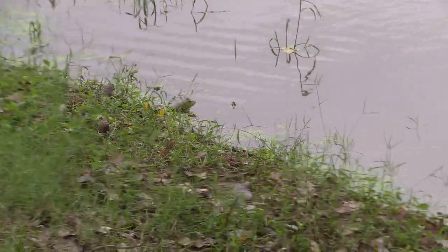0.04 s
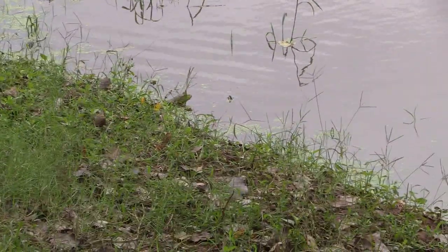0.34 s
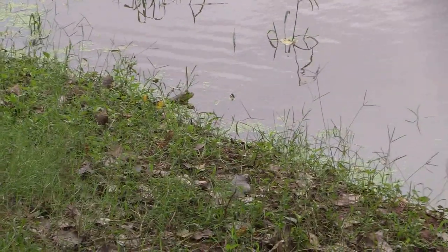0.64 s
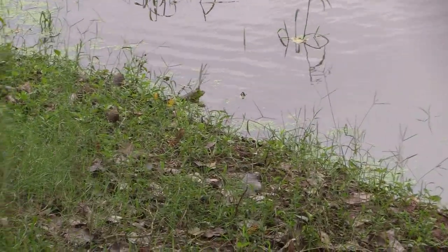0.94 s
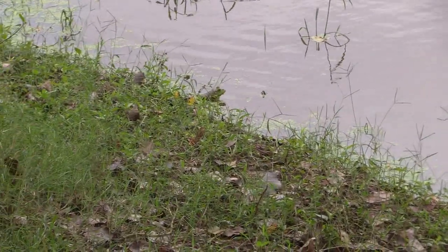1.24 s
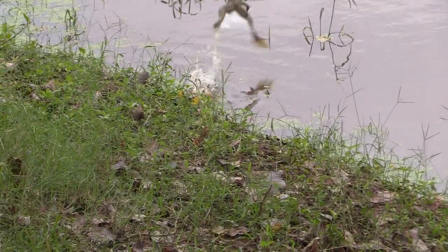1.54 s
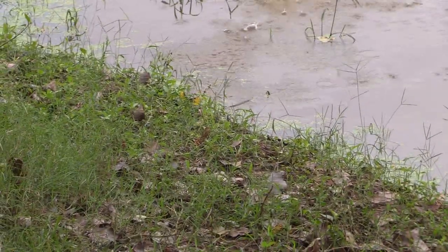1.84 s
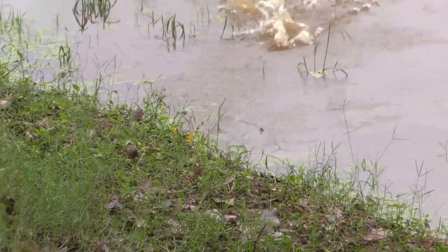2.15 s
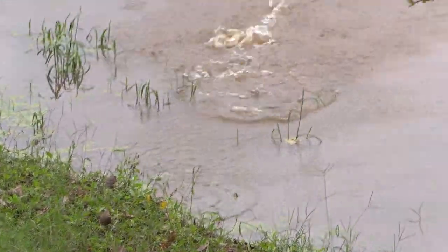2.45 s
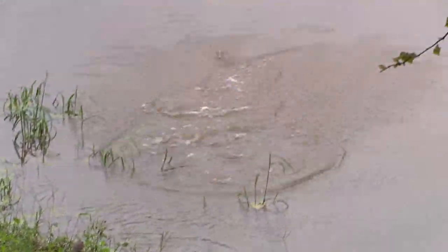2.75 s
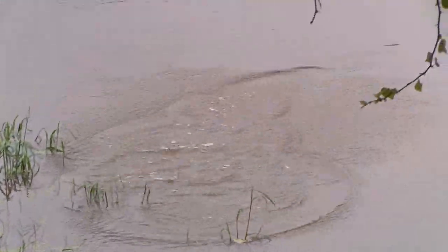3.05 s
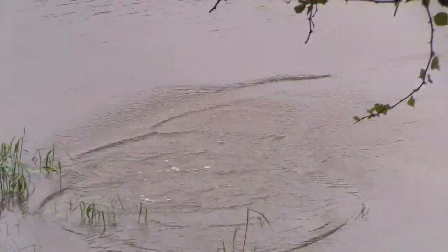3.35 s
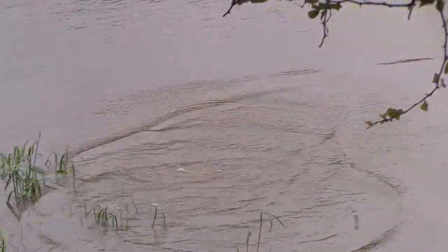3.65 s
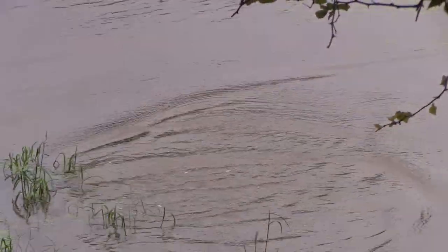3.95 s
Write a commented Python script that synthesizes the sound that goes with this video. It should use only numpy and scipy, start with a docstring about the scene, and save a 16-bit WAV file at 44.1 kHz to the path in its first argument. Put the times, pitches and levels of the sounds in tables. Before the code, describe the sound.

A frog splashes into a pond: a small wet flick, then a sharp smack and under a second of sloshing and gurgling. Wind rumbles on the microphone throughout, over steady outdoor hiss and faint, very high insect trills.

```python
"""Wind buffets the microphone over a steady outdoor hiss, and insects trill very high in the grass.
Then a frog kicks off from a wet bank and smacks into a muddy pond. For under a second the water
slaps against itself, throws spray, gulps as trapped air bubbles ring, and churns with tiny drops.
A limiter dips everything slightly under the strongest buffets."""
import sys
import numpy as np
from scipy import signal
from scipy.fft import rfft, irfft
from scipy.io import wavfile
from scipy.ndimage import uniform_filter1d

SR = 44100
rng = np.random.default_rng(int(sys.argv[2]) if len(sys.argv) > 2 else 0)


def store_wav(level_fs):
    """Save 16-bit WAV to argv[1]."""
    pcm = np.round(np.clip(np.atleast_2d(level_fs), -1, 1) * 32767)
    wavfile.write(sys.argv[1], SR, pcm.T.astype(np.int16))


N = 176400
T = np.arange(N) / SR


# Smacks of water on water (time [s], peak level [dB], treble limit [Hz])
WATER_SLAPS = [(1.881, -27, 12500), (1.960, -31, 3200), (2.016, -29.5, 3000), (2.019, -34, 2620),
               (2.091, -32, 2800), (2.269, -43, 3200), (2.321, -35, 3000), (2.357, -40, 2200),
               (2.492, -42, 1600)]

def slap(db, treble_hz):
    """Water hits water: a sharp jolt of pressure, then a short wet tail."""
    pulse_s, tail_s, low_hz = 0.000046, 0.0034, 500
    t = T[:SR // 20]
    pulse = (1 - t / pulse_s) * np.exp(-t / pulse_s)
    crack = band(pulse, low_hz, treble_hz)
    tail = unit(band(rng.standard_normal(len(t)), low_hz, treble_hz)) * np.exp(-t / tail_s)
    return amp(db) * (crack / abs(crack).max() + amp(-14) * tail)


# Large bubbles (time [s], starting pitch [Hz], peak level [dB], fade time [cycles])
BIG_BUBBLES = [(1.498, 1750, -44, 4), (1.505, 2030, -36.5, 5), (1.877, 750, -45, 1.8), (1.892, 523, -50, 4),
               (1.931, 1890, -46, 5), (1.96, 1270, -43.5, 6.2), (1.984, 610, -44, 2.9),
               (1.998, 1870, -48, 7), (2.018, 2800, -42, 9.9), (2.016, 450, -43, 1.9),
               (2.04, 975, -36.5, 3.7), (2.091, 455, -34, 1.6), (2.189, 557, -32.5, 1.9),
               (2.197, 546, -41, 3), (2.211, 2800, -52, 10), (2.246, 1114, -40.5, 4.3),
               (2.268, 2250, -42, 7.2), (2.273, 1710, -40, 5.4), (2.319, 2900, -44.5, 10),
               (2.356, 1390, -41.5, 3.7), (2.466, 626, -45, 4), (2.491, 910, -41, 3)]

def bubble(hz, fade_cycles):
    """A pocket of trapped air rings: its note swells, climbs and fades."""
    swell_cycles, rise_per_cycle = 0.7, 0.017
    cycles = np.arange(int(6 * fade_cycles * SR / hz) + 2) * hz / SR
    loudness = (1 - np.exp(-(cycles / swell_cycles) ** 2)) * np.exp(-cycles / fade_cycles)
    note = np.sin(2 * np.pi * cycles * (1 + rise_per_cycle * cycles / 2))
    return loudness / loudness.max() * note


# Spray as the frog leaves the bank, hits the water and thrashes
# (time [s], level [dB], rise time [s], fade time [s], treble limit [Hz])
SPRAY_BURSTS = [(1.495, -49, 0.018, .016, 3770), (1.863, -51, .003, .015, 5000),
                (1.879, -51, .002, .0045, 12500), (1.880, -46.5, .004, 0.024, 3930),
                (2.133, -54, .003, .005, 6000), (2.262, -53, .007, 0.022, 3500),
                (2.277, -54, .003, .006, 8000)]

def spray(db, rise_s, fade_s, treble_hz):
    """A sheet of water tears into fine droplets, making a quick burst of grainy noise."""
    t = T[:SR // 4]
    droplets = unit(band(rng.laplace(size=len(t)), low_hz=1220, high_hz=treble_hz))
    loudness = np.minimum(t / rise_s, 1) * np.exp(-np.maximum(t - rise_s, 0) / fade_s)
    return amp(db) * droplets * loudness


# How strongly the water is stirred (time [s], level [dB])
CHURN_LEVELS = [(1.87, -68), (1.89, -49), (1.925, -52.5), (1.95, -56.5), (2.015, -54), (2.055, -57.5),
                (2.088, -50), (2.115, -56), (2.175, -54), (2.228, -53.5), (2.255, -48.5), (2.28, -51),
                (2.305, -56.5), (2.38, -57.5), (2.51, -57.5), (2.545, -67), (2.6, -57.5), (2.64, -80)]
# The tone of stirred water, low to high (frequency [Hz], relative level [dB])
WATER_TONE = [(200, -26), (400, 0.5), (620, -3.5), (850, -3.5), (1300, -3.5), (2000, -3), (2900, -3.5),
              (3800, -10), (5000, -17.5), (8000, -19.5), (15000, -38)]

def churn():
    """Stirred water: many small drops each ring like a tiny bubble, over fizzing foam."""
    drops_per_s, spread_db = 1500, 3.5
    pitches = np.geomspace(350, 6000, 32)
    drops = np.zeros(N)
    for hz in pitches:
        strength = amp(spread_db * np.minimum(rng.exponential(1, N), 2.8))
        lands = rng.random(N) < drops_per_s / len(pitches) / SR
        # start one ring wherever a drop lands
        drops += signal.oaconvolve(strength * lands, hz * bubble(hz, fade_cycles=3.0))[:N]
    foam = noise(WATER_TONE)
    stirring = amp(np.interp(T, *np.transpose(CHURN_LEVELS), left=-120, right=-120))
    return stirring * (amp(-2) * colour(drops, WATER_TONE) + amp(-1) * foam)


def bank_echo(sound):
    """Sound bounces off the banks and trees as a short, soft-edged echo."""
    delay_s, fade_s = 0.006, 0.33
    t = T[:SR // 2]
    tail = rng.standard_normal(len(t)) * amp(-60 * t / fade_s) * (t > delay_s)
    return signal.fftconvolve(sound, band(tail / np.linalg.norm(tail), 250, 4600))[:N]


# Gusts, before wind() adds its boosts (time [s], buffet level [dB], flutter level [dB])
GUSTS = [(0.0, -33.5, -44.5), (0.14, -27, -35), (0.5, -30, -40), (0.87, -24, -41.5), (0.97, -37, -37.5),
         (1.0, -30.5, -58), (1.04, -23.5, -38), (1.07, -38, -47), (1.14, -27, -43), (1.24, -40.5, -46),
         (1.39, -31, -47.5), (1.48, -34, -49), (2.47, -34, -38.5), (2.65, -28, -45), (2.67, -37, -37),
         (2.7, -29.5, -54), (2.77, -27.5, -31), (3.17, -28.5, -42.5), (3.23, -35, -43.5),
         (3.62, -38, -46.5), (3.83, -30, -37), (3.89, -30.5, -42), (3.97, -30.5, -35.5),
         (4.0, -29.5, -35.5)]
# The tones of the deep buffet and the lighter flutter (frequency [Hz], relative level [dB])
BUFFET_TONE = [(10, -27), (22, -6.5), (38, 1), (70, -1.5), (100, -6.5), (140, -15.5), (220, -28.5),
               (500, -80.5)]
FLUTTER_TONE = [(50, -30), (100, 1.5), (140, 0.5), (190, -6.5), (250, -13), (330, -19.5), (450, -29.5),
                (700, -36), (1500, -61.5)]

def wind():
    """Gusts push on the microphone, making a deep rumble with a lighter flutter above it."""
    buffet_boost_db, flutter_boost_db = 1, 2.5
    times, buffet_db, flutter_db = np.transpose(GUSTS)
    buffet = steadied(noise(BUFFET_TONE), span_s=0.25) * amp(np.interp(T, times, buffet_db))
    flutter = steadied(noise(FLUTTER_TONE), span_s=0.18) * amp(np.interp(T, times, flutter_db))
    return amp(buffet_boost_db) * buffet + amp(flutter_boost_db) * flutter


# Insect calls (first pulse [s], end [s], pulse rate [per s], pitch [Hz],
# spread either side of the pitch [Hz], level [dB], sharpness [higher is shorter pulses])
INSECT_TRILLS = [(1.743, 2.73, 16.3, 13800, 700, -61, 3.3), (2.5, 4.0, 28.85, 14100, 750, -62.5, 1.4),
                 (1.405, 3, 17.6, 10500, 860, -67.5, 2.5), (3.2, 4.0, 36, 10700, 550, -68.5, .6),
                 (0.068, 0.6, 3.5, 9100, 340, -71, 9.2), (2.92, 3.6, 4.1, 8300, 230, -69.5, 8)]

def trill(first_s, end_s, rate, hz, spread_hz, db, sharpness):
    """An insect makes a thin, high rasp in regular pulses of uneven strength."""
    frequencies = np.fft.rfftfreq(N, 1 / SR)
    narrow_band = np.exp(-0.25 * ((frequencies - hz) / spread_hz) ** 2)
    rasp = unit(irfft(rfft(rng.standard_normal(N)) * narrow_band, N))
    pulse_count = (T - first_s) * rate
    pulses = abs(np.cos(np.pi * pulse_count)) ** sharpness
    uneven_db = 2 * rng.standard_normal(400)[np.round(pulse_count).astype(int)]
    calling = (pulse_count > -0.5) & (T < end_s)
    return amp(db + uneven_db) * rasp * pulses * calling


# The tone of the outdoor hiss (frequency [Hz], relative level [dB])
HISS_TONE = [(100, -6), (350, 4.5), (600, 2.5), (1000, 0.5), (1700, -2), (2400, -2), (3000, 1.5),
             (3800, 0.5), (4900, -8.5), (6500, -14.5), (7700, -13.5), (8400, -9), (9600, -12.5),
             (11500, -12), (13000, -8), (14400, -7), (16000, -9)]
# Its slow drift (time [s], level change [dB])
HISS_DRIFT = [(0, -1.1), (1.1, -0.6), (1.6, 0.22), (2.7, 0.049), (3.3, .5), (4, 0.76)]

def hiss(db):
    """A smooth, distant hiss drifts a little in level."""
    drift_db = np.interp(T, *np.transpose(HISS_DRIFT))
    return amp(db + drift_db) * noise(HISS_TONE)


def amp(db):
    """Turns decibels into a number to multiply a sound by."""
    return 10 ** (np.asarray(db) / 20)


def unit(sound):
    """Scales a sound to an average (rms) strength of one."""
    return sound / np.sqrt(np.mean(sound ** 2) + 1e-20)


def add(mix, start_s, sound):
    """Mixes a sound in at the given time."""
    part = mix[round(start_s * SR):][:len(sound)]
    part += sound[:len(part)]


def colour(sound, tone):
    """Shapes a sound's lows and highs with a tone table, at a strength of one."""
    hz, db = np.transpose(tone)
    frequencies = np.fft.rfftfreq(N, 1 / SR)
    gains = amp(np.interp(np.log(frequencies + 1), np.log(hz), db))
    return unit(irfft(rfft(sound) * gains, N))


def band(sound, low_hz, high_hz):
    """Keeps what lies between two frequencies, cutting the highs more steeply."""
    high_pass = signal.butter(2, low_hz, "high", fs=SR, output="sos")
    low_pass = signal.butter(4, min(high_hz, SR * 0.45), fs=SR, output="sos")
    return signal.sosfilt(np.vstack([high_pass, low_pass]), sound)


def noise(tone):
    """Random noise shaped by a tone table."""
    return colour(rng.standard_normal(N), tone)


def steadied(sound, span_s):
    """Evens out the slow chance swells of a noise."""
    return sound / np.sqrt(uniform_filter1d(sound ** 2, round(span_s * SR)) + 1e-9)


def scene():
    """The frog's splash and its faint echo, amid wind, hiss and insects."""
    air = wind() + hiss(db=-54) + sum(trill(*row) for row in INSECT_TRILLS)
    water = churn()
    for start_s, *row in SPRAY_BURSTS:
        add(water, start_s, spray(*row))
    for start_s, *row in WATER_SLAPS:
        add(water, start_s, slap(*row))
    for start_s, hz, db, fade_cycles in BIG_BUBBLES:
        add(water, start_s, amp(db) * bubble(hz, fade_cycles))
    return (air + water + amp(-12.5) * bank_echo(water))[None]


def record(dry):
    """A limiter briefly turns down the loudest moments, then the very highest treble is cut."""
    limit_db, ratio, recover_db_per_s, treble_hz = -20, 10, 133, 15850
    level_db = 20 * np.log10(abs(dry[0]) + 1e-9)
    fall_db = T * recover_db_per_s
    peak_db = np.maximum.accumulate(level_db + fall_db) - fall_db  # jumps up, then sinks steadily
    excess_db = np.maximum(peak_db - limit_db, 0)
    dip_db = uniform_filter1d(excess_db, size=90) * (1 - 1 / ratio)
    treble_cut = signal.firwin(511, treble_hz, window=("kaiser", 9), fs=SR)
    return signal.oaconvolve(dry * amp(-dip_db), treble_cut[None], "same")


dry = scene()
out = record(dry)
store_wav(out)
```